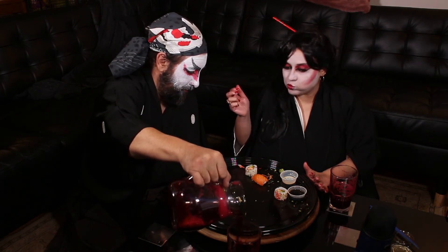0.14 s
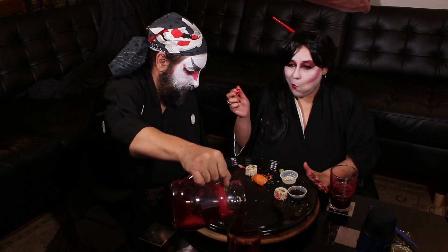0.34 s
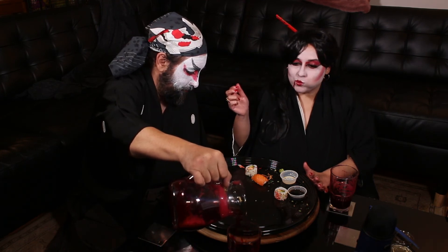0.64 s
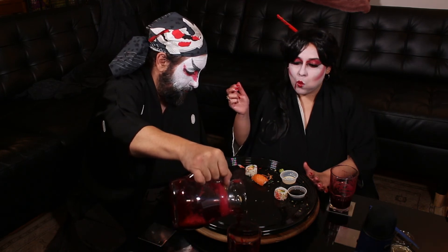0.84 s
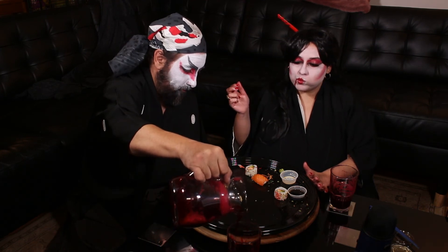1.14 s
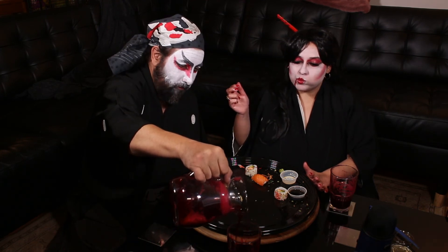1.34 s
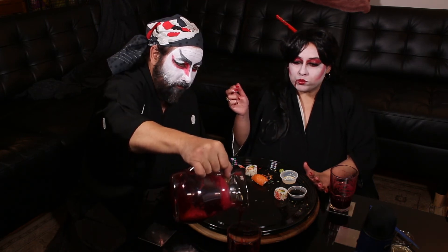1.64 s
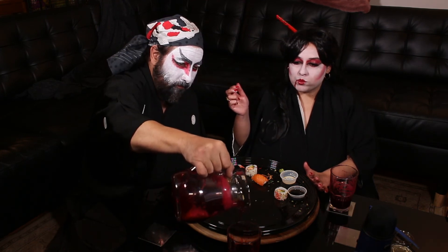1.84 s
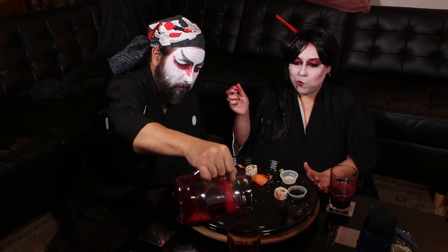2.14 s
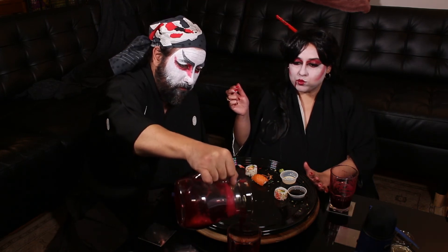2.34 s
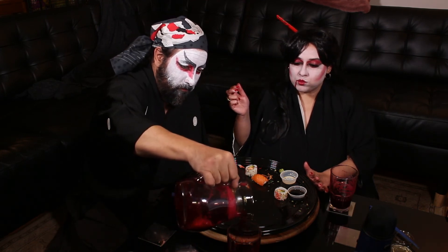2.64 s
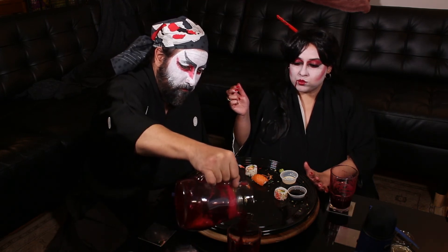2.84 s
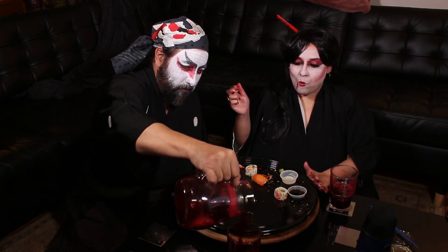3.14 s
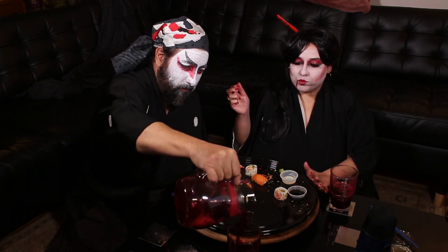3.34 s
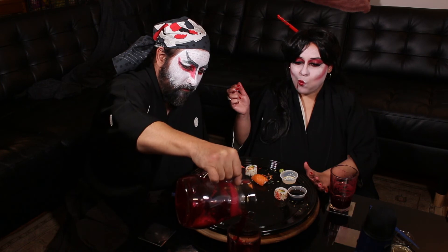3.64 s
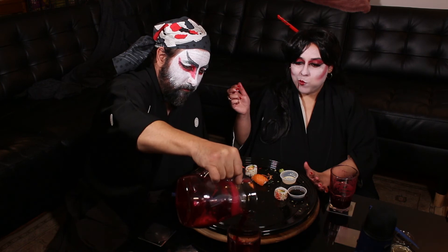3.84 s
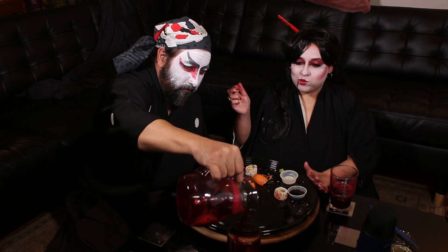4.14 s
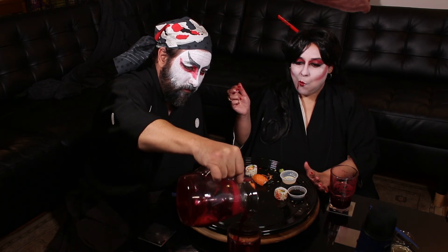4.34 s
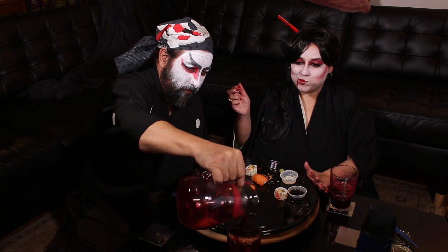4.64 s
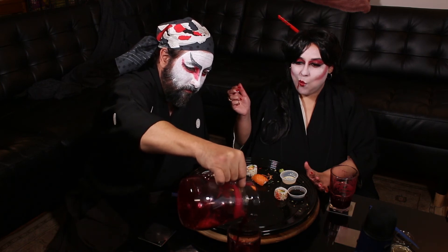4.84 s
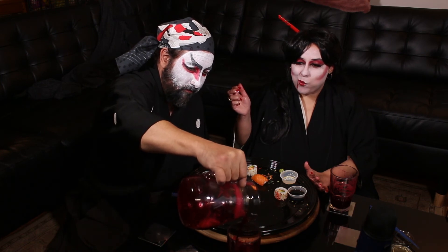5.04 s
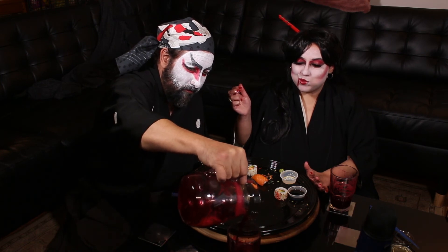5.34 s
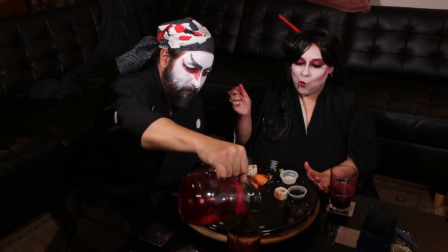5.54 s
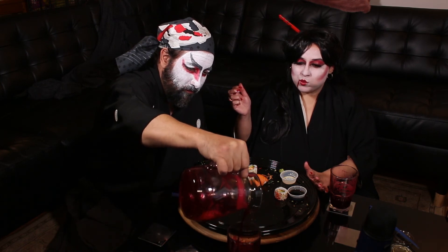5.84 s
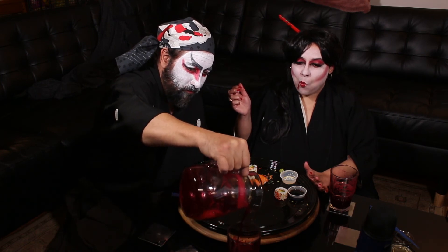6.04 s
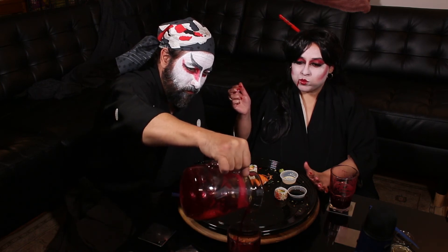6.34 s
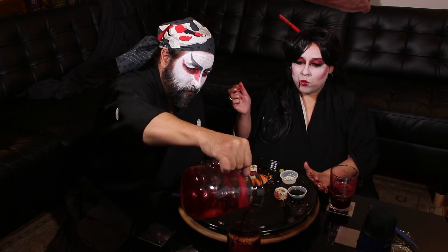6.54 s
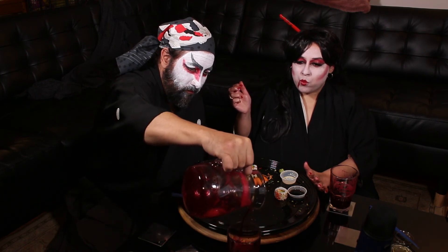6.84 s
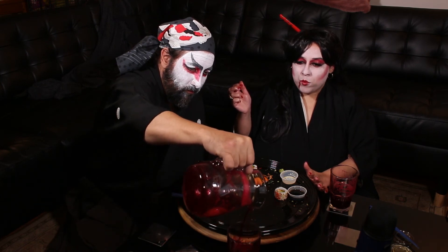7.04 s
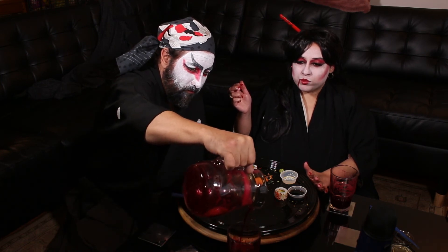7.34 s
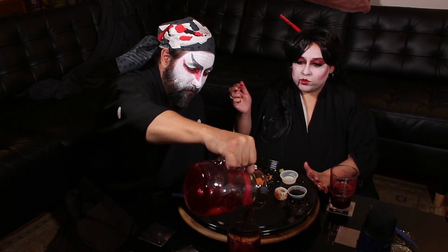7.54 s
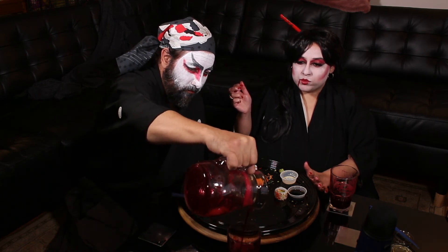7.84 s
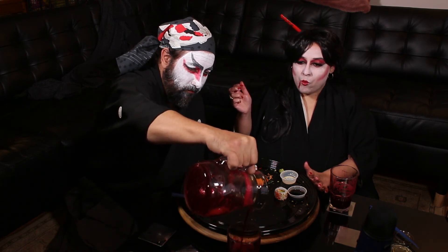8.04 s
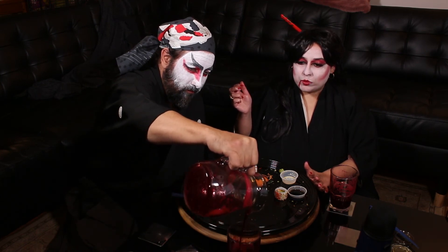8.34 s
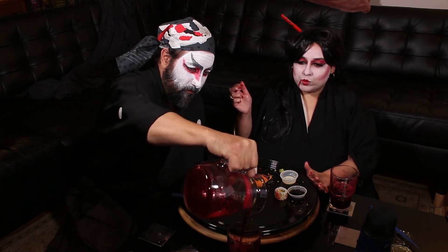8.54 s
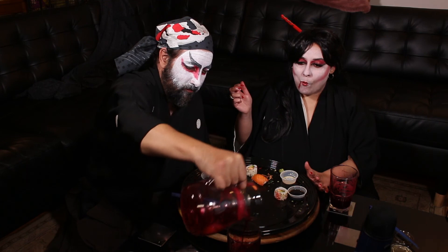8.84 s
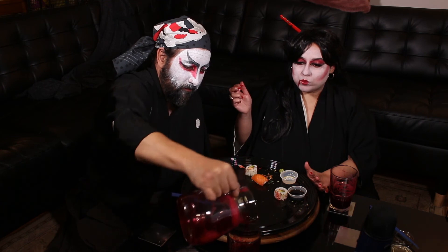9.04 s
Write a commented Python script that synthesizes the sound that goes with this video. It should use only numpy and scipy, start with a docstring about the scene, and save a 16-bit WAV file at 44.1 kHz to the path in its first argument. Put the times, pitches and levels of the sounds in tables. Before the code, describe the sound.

A drink trickles from a pitcher into a glass in a thin, broken stream. Drops splash, small bubbles chirp and larger ones plop, softly thumping the wooden tray underneath. After about three seconds the gurgle grows and rises slightly in pitch. Near the end the pitcher sloshes once, and the stream thins, then spurts. The pour is close and a little to the right, in a furnished room with a quiet hum and hiss.

```python
"""A thin, broken stream of drink falls from a pitcher into a glass on a wooden tray, right of two close
microphones. From the start, slugs of liquid crack on the surface and trap bubbles: small ones chirp, large
ones sound the air in the glass and thump the tray; the wall rings faintly. From 3 s the gurgle grows and
the air column rises in pitch. Near 8.3 s the pitcher tips back and sloshes once; the stream thins, then
spurts at 9.1 s. Throughout, a furnished room answers over a quiet hum and hiss."""
import sys
import numpy as np
from scipy import signal
from scipy.fft import rfft, irfft, next_fast_len
from scipy.io import wavfile

SR = 44100
rng = np.random.default_rng(int(sys.argv[2]) if len(sys.argv) > 2 else 0)


def pcm_store(signal):
    """Save signal as 16-bit PCM."""
    levels = np.round(np.clip(np.atleast_2d(signal), -1, 1) * 32767)
    wavfile.write(sys.argv[1], SR, levels.astype(np.int16).T)


N = 405719

# Stream between loud drops. Each row: time in seconds, relative fizz and gurgle levels in dB.
STREAM = [(0.0, -42.5, -67), (0.28, -53.5, -65), (0.87, -52, -75), (1.84, -54, -56), (2.02, -53.5, -49),
          (2.2, -58, -60), (2.48, -56, -59), (2.69, -47.5, -65), (2.94, -50, -65), (3.12, -45, -44),
          (3.43, -45, -52.5), (3.89, -49, -47.5), (4.33, -46, -47), (5.3, -49, -50), (5.69, -45.5, -39.5),
          (6.02, -53, -44), (6.48, -51.5, -45), (8.33, -55.5, -55), (8.8, -53, -61.5), (9.02, -67.5, -78),
          (9.08, -49, -46), (9.2, -51, -41)]
# Each row: start in seconds, relative peak in dB, pitch in Hz, relative crack level in dB.
SMALL_BUBBLES = [(0.046, -28.5, 3500, -57), (0.083, -31, 3500, -14.5), (0.1429, -29.5, 3800, -58),
                 (0.285, -34, 3680, -54), (0.3795, -21.5, 4650, -60), (0.5472, -47, 3550, -27.5),
                 (0.6625, -21.5, 6240, -57), (0.695, -30, 3660, -65), (0.743, -42, 3420, -21),
                 (0.8154, -32.5, 4860, -34), (1.1125, -28, 3600, -24.5), (1.1674, -14.5, 4400, -9.5),
                 (1.197, -39, 3070, -50), (1.222, -20, 3630, -22), (1.3629, -33.5, 3320, -52),
                 (1.4439, -21.5, 3500, -20), (1.482, -30, 3050, -51), (1.493, -29, 3100, -49),
                 (1.5374, -46, 3470, -27), (1.551, -27, 3070, -35), (1.5712, -24, 3450, -43),
                 (1.662, -26, 5850, -17.5), (1.712, -38, 3030, -55), (1.773, -29.5, 6000, -27),
                 (1.8292, -32.5, 3530, -17.5), (1.8815, -26.5, 3420, -24), (1.91, -22.5, 5360, -47),
                 (1.946, -20, 5430, -24), (1.99, -26, 3400, -32), (2.002, -25, 3560, -15.5),
                 (2.121, -37.5, 3500, -56), (2.144, -37.5, 3630, -65), (2.374, -40, 7500, -43),
                 (2.413, -51, 3350, -40), (2.489, -28, 4200, -43), (2.4961, -19.5, 5340, -16.5),
                 (2.519, -29, 3430, -50), (2.5607, -14, 3690, -30), (2.606, -22.5, 3760, -23),
                 (2.74, -58, 3500, -55), (2.7686, -37, 3000, -24), (2.818, -56, 3550, -28),
                 (2.8414, -26, 5840, -24), (2.8913, -23, 3360, -57), (2.924, -33, 3500, -45),
                 (2.95, -24.5, 3470, -54), (2.9758, -32, 3470, -31), (2.9815, -33, 3520, -27),
                 (3.0022, -26, 3620, -49), (3.075, -38, 4900, -23), (3.087, -31, 8000, -27),
                 (3.1285, -43, 8300, -22), (3.1684, -25, 5190, -28), (3.2225, -36, 3500, -30),
                 (3.253, -39, 3150, -23), (3.3996, -31.5, 3140, -54), (3.427, -32, 4940, -50),
                 (3.466, -28, 3700, -23), (3.5164, -27.5, 3550, -49), (3.5365, -35, 3500, -36),
                 (3.59, -29, 5760, -29), (3.599, -38, 7500, -25), (3.6276, -27, 3700, -24),
                 (3.6585, -24, 3700, -21), (3.7165, -27.5, 3580, -26), (3.8249, -42, 3580, -16.5),
                 (3.836, -31, 3800, -30), (3.895, -33, 7100, -35), (3.9473, -32, 3050, -33),
                 (4.093, -33, 4000, -26), (4.1233, -22.5, 3340, -48), (4.1626, -23, 3400, -54),
                 (4.1812, -18.5, 7400, -25), (4.231, -24, 3380, -25), (4.261, -39, 3530, -50),
                 (4.279, -13.5, 3280, -56), (4.3152, -26, 3530, -23), (4.3982, -25.5, 2940, -22.5),
                 (4.4458, -29, 3500, -38), (4.5014, -18.5, 3720, -60), (4.5194, -24.5, 3500, -57),
                 (4.586, -27.5, 3680, -26.5), (4.6545, -26, 3400, -21.5), (4.7361, -20, 3430, -70),
                 (4.7832, -27.5, 3560, -54), (4.816, -28, 3070, -21), (4.8467, -37, 2900, -22.5),
                 (4.8632, -27, 2900, -53), (4.906, -29, 2930, -38), (4.9396, -26, 3340, -56),
                 (4.9656, -40, 3050, -14.5), (5.035, -30, 2900, -59), (5.1094, -29.5, 5000, -40),
                 (5.1294, -28.5, 2990, -28), (5.167, -32.5, 3770, -22), (5.2056, -26.5, 5070, -34),
                 (5.247, -23.5, 7300, -24), (5.2793, -36, 5200, -26), (5.3247, -24.5, 2900, -60),
                 (5.3939, -21.5, 7260, -53), (5.4093, -25, 3460, -56), (5.467, -29, 2790, -31),
                 (5.565, -20.5, 5250, -24), (5.585, -27, 6600, -24), (5.6156, -25, 3760, -24),
                 (5.639, -20, 5160, -25), (5.6676, -27.5, 3260, -23.5), (5.76, -26.5, 2900, -25),
                 (5.824, -31, 2930, -57), (5.8534, -22, 5060, -59), (6.064, -32, 3600, -76),
                 (6.1, -28.5, 3110, -30), (6.1684, -17.5, 3550, -33), (6.2594, -29, 3580, -34),
                 (6.287, -21, 4020, -30), (6.322, -34, 4800, -52), (6.367, -29, 2920, -38),
                 (6.427, -27, 2900, -30), (6.6177, -28.5, 2920, -63), (6.668, -24, 2880, -18),
                 (6.7707, -20.5, 2950, -73), (6.8934, -24, 2970, -28), (7.022, -24, 5830, -54),
                 (7.0937, -21, 3550, -30), (7.0935, -17.5, 5280, -60), (7.144, -22, 2870, -31),
                 (7.182, -24.5, 3840, -54), (7.199, -26.5, 4040, -47), (7.288, -42, 5200, -53),
                 (7.3311, -27, 3170, -80), (7.4374, -49, 3080, -42), (7.4624, -29.5, 2800, -31.5),
                 (7.6262, -21, 3000, -18.5), (7.7533, -19, 3330, -65), (7.7835, -19, 3570, -26),
                 (7.847, -28, 2930, -19), (7.948, -54, 3530, -27.5), (8.0331, -25.5, 5180, -28),
                 (8.1603, -36.5, 3520, -82), (8.218, -40.5, 2930, -72), (8.295, -30.5, 3780, -39),
                 (8.534, -37.5, 2960, -68), (8.6913, -41, 4330, -75), (8.7935, -43, 2850, -41),
                 (8.8929, -37.5, 2970, -80), (9.0573, -51, 3680, -34.5), (9.174, -34.5, 5700, -36)]
# Each row: start in seconds, relative peak in dB, pitch in Hz, climb as share of pitch per decay time.
MEDIUM_BUBBLES = [(0.0287, -40, 1200, 0.15), (0.044, -33.5, 2080, 0.0038), (0.065, -34.5, 1730, 0.037),
                  (0.2867, -37.5, 2130, 0.048), (0.3624, -27.5, 1735, 0.0017), (0.458, -45, 1870, .04),
                  (0.508, -46, 1970, 0.035), (0.5492, -32.5, 1740, .06), (0.55, -40.5, 817, 0.63),
                  (0.615, -41, 1830, 0.085), (0.6626, -24.5, 1103, 0.14), (0.7426, -40, 1800, 0.076),
                  (0.81, -44, 796, 0.51), (0.892, -53, 950, 0.14), (0.918, -50, 1020, 0),
                  (0.922, -48.5, 1820, 0.28), (1.066, -51, 1240, 0), (1.1328, -36, 1900, 0.0098),
                  (1.3628, -36.5, 2120, 0.093), (1.443, -33, 1850, 0.064), (1.481, -26.5, 1550, 0.33),
                  (1.5457, -30, 1840, 0.055), (1.571, -31, 1994, 0.14), (1.7727, -31, 1750, .0),
                  (1.8991, -28.5, 1910, 0.016), (2.1442, -29, 1540, 0.14), (2.545, -54, 2000, 0.12),
                  (2.585, -32, 1750, 0), (2.6665, -35.5, 1830, 0), (2.7687, -33, 1860, 0.11),
                  (2.8917, -31, 1900, 0.025), (2.95, -29.5, 1650, 0.14), (3.0367, -34, 1940, 0.0027),
                  (3.2258, -32, 1230, .05), (3.6533, -32.5, 1230, 0), (4.053, -30.5, 1505, 0.043),
                  (4.381, -35.5, 1245, 0.022), (4.6783, -32.5, 1254, 0.003), (6.7539, -31, 1580, 0.065),
                  (6.8912, -35.5, 1204, 0.034), (7.022, -37.5, 1930, 0), (7.39, -39, 950, 0.29),
                  (7.514, -48.5, 900, 0.44), (7.681, -42, 1054, 0.45), (7.7507, -29.5, 2190, 0.024),
                  (8.434, -43.5, 970, 0.023), (8.543, -47.5, 1930, 0.13)]
# Each row: start in seconds, relative peak in dB, pitch in Hz, relative tray thump in dB.
LARGE_BUBBLES = [(0.063, -36.5, 1300, -65), (0.121, -32, 704, -43.5), (0.547, -37, 720, -41.5),
                 (0.663, -24, 1104, -41.5), (1.115, -34, 1185, -42), (1.199, -23.5, 800, -38),
                 (1.446, -21, 838, -30), (1.484, -25.5, 780, -52), (1.539, -22.5, 800, -35),
                 (1.838, -26, 795, -44), (1.848, -22.5, 694, -40), (1.906, -27.5, 830, -39),
                 (1.947, -25, 730, -53), (2.001, -35.5, 874, -50), (2.039, -17.5, 820, -37),
                 (2.631, -36.5, 1120, -40), (2.785, -31.5, 1210, -44.5), (2.947, -19.5, 1020, -36),
                 (2.975, -15, 746, -33.5), (3.034, -23, 744, -54), (3.117, -34, 744, -57),
                 (3.225, -20, 612, -31.5), (3.366, -23.5, 602, -39), (3.588, -29, 600, -40),
                 (3.656, -18, 630, -28.5), (3.721, -21.5, 590, -35), (3.769, -25, 526, -36),
                 (3.835, -31.5, 840, -59), (3.871, -30.5, 944, -59), (3.922, -29.5, 910, -59),
                 (4.052, -25.5, 604, -40), (4.158, -20.5, 600, -28), (4.275, -23.5, 814, -58),
                 (4.468, -29.5, 617, -44), (4.499, -32, 607, -52), (4.594, -31.5, 604, -63),
                 (4.625, -31, 696, -59), (4.76, -17.5, 550, -27.5), (4.818, -31.5, 985, -35),
                 (4.94, -28, 544, -32), (4.963, -40, 880, -30.5), (5.047, -32.5, 856, -29.5),
                 (5.221, -31.5, 910, -33), (5.374, -33.5, 1045, -44), (5.486, -25, 577, -32.5),
                 (5.588, -31.5, 974, -34.5), (5.758, -31, 950, -32.5), (5.867, -25.5, 555, -29.5),
                 (6.255, -21.5, 545, -33), (6.295, -27.5, 563, -32), (6.328, -30, 925, -53),
                 (6.409, -24, 607, -37), (6.551, -25, 598, -37.5), (6.666, -29.5, 690, -44),
                 (6.751, -22, 905, -29.5), (6.885, -30, 605, -33.5), (6.971, -28.5, 637, -37),
                 (7.095, -33, 970, -41.5), (7.18, -23, 1114, -33.5), (7.208, -22, 930, -53),
                 (7.435, -32.5, 1060, -48), (7.625, -22.5, 580, -34.5), (7.786, -28, 643, -34.5),
                 (7.848, -25, 950, -53), (7.947, -33, 680, -33), (8.101, -34.5, 995, -37.5),
                 (8.249, -32, 1023, -50), (8.618, -41.5, 1150, -57), (9.113, -32, 1015, -56)]
# Air column of the filling glass. Each row: time in seconds, pitch in Hz.
AIR_COLUMN_HZ = [(0, 807), (3, 757), (4, 898), (6, 918), (9.2, 942)]

# Resonances. Each row: centre in Hz, width in Hz, gain in dB.
GLASS_AIR_MODES = [(1910, 117, 14.5), (2900, 88, 16.5), (3550, 213, 14), (5190, 550, 13.5),
                   (7260, 2200, -6)]  # cross modes of the air in the glass
GLASS_WALL_MODES = [(2300, 12, 7), (778.6, 14, 2), (983, 44, -7), (4530, 25, 3)]
FILM_MODES = [(6970, 3200, 2), (15000, 2000, -6.5)]  # bursting film
TRAY_MODES = [(244.5, 26, 6), (204, 26, 2), (280.5, 11.2, -0.5), (140.3, 13.5, -1.5), (437.4, 7.9, -2),
              (598, 41, -4.5)]
TRAY_FEET_MODES = [(245, 135, 0)]  # rocking on the feet softens each thump
PITCHER_MODES = [(308, 184, 16.5), (153, 86, 16)]
TREBLE_SPREAD_BAND = [(12500, 9000, -3)]

# Spectra. Each row: frequency in Hz, relative gain in dB.
FIZZ_SPECTRUM_DB = [(400, 28), (1200, 14), (2600, 9.5), (3400, 5), (5500, -15), (8000, -51), (15000, 2)]
GLASS_MOUTH_DB = [(540, -7.5), (580, -1), (2200, 3.5), (2600, 1.5), (2850, 1.5), (2950, 7), (9000, 3.5)]  # what leaves the glass
LEFT_MINUS_RIGHT_DB = [(100, 3), (400, -5.5), (700, -8), (3000, -8.5), (15000, -4.5)]
REVERB_DB = [(200, -11), (1000, -10.5), (4000, -11), (8000, -6), (14000, -7)]
ROOM_TONE_SPECTRUM_DB = [(15, -35), (30, 11), (65, -17.5), (82, 1), (100, -8), (125, -4), (250, -5.5),
                         (340, -12.5), (1000, -20.5), (2500, -32), (5000, -36), (9000, -40), (16000, -59)]
# Room decay. Each row: frequency in Hz, T60 in seconds.
ROOM_T60_S = [(200, .3), (1000, .35), (4000, .3), (12000, .25)]
# Room tone. Each row: frequency in Hz, left-right correlation.
ROOM_TONE_CORRELATION = [(30, 0.22), (300, 0.64), (3000, 0.11), (15000, 0.11)]


def small_bubbles():
    """Small bubbles die within a few cycles; each drop cracks and shakes the air in the glass."""
    start_s, db, hz, crack_db = np.transpose(SMALL_BUBBLES)
    jitter = rng.standard_normal((len(start_s), 2))
    cycles = 5 * np.minimum(1, (4200 / hz) ** 0.1) * amp(2 * jitter[:, 0])
    chirps = bubbles(start_s, db - 3.5, hz, cycles, 0.024 * jitter[:, 1], attack_s=67e-6, samples=600)
    t = np.arange(500) / SR
    noise = rng.standard_normal((len(start_s), len(t))) * (1 - np.exp(-t / 0.001))
    cracks = place(start_s, amp(crack_db[:, None] + 3.5 - 60 * t / 0.0049) * noise)
    splash = place(start_s, amp(db[:, None] - 12 - 60 * t / 0.017) * noise)
    return chirps + filtered(cracks, modes(FILM_MODES)) + filtered(splash, modes(GLASS_AIR_MODES))


def large_bubbles():
    """Slugs trap large bubbles and shake the air column. Returns sound in air, pushes on the tray."""
    start_s, db, hz, thump_db = np.transpose(LARGE_BUBBLES)
    jitter = rng.standard_normal((len(start_s), 3))
    cycles, climb = 6.54 * amp(2 * jitter[:, 0]), 0.039 + 0.046 * jitter[:, 1]
    glugs = bubbles(start_s, db, hz, cycles, climb, attack_s=59e-6, samples=2000, rough=0.07)
    column_hz = at_time(AIR_COLUMN_HZ, start_s)[0] * amp(0.28 * jitter[:, 2])
    column = bubbles(start_s, db - 12, column_hz, cycles=7, climb=0, attack_s=0.00048, samples=2600)
    return glugs + column, slug_pushes(start_s, thump_db + 19.5)


def medium_bubbles():
    """Singing bubbles, some level in pitch; steep climbers ring for more cycles."""
    start_s, db, hz, climb = np.transpose(MEDIUM_BUBBLES)
    cycles = (5.2 + 9 * climb) * amp(1.5 * rng.standard_normal(len(start_s)))
    return bubbles(start_s, db + 4.5, hz, cycles, climb, attack_s=0.00025, samples=1400, rough=0.044)


def bubbles(start_s, peak_db, hz, cycles, climb, attack_s, samples, rough=0):
    """Sines falling to 1/e in `cycles`; pitch climbs near the surface, churning liquid roughens it."""
    t = np.arange(samples) / SR
    decays = t * (hz / cycles)[:, None]
    turns = hz[:, None] * t * (1 + np.reshape(climb, (-1, 1)) * np.minimum(decays, 3) / 2)
    if rough:
        turns += rough * np.sqrt(hz[:, None] / SR) * np.cumsum(rng.standard_normal(decays.shape), 1)
    ring = np.sin(2 * np.pi * turns) * np.exp(-decays) * (1 - np.exp(-t / attack_s))
    return place(start_s, amp(peak_db)[:, None] * ring / np.abs(ring).max(1, keepdims=True))


def slug_pushes(start_s, db):
    """Force on the tray: a slug stops in about 1 ms."""
    return place(start_s, amp(db)[:, None] * np.hanning(50))


def tray(pushes):
    """The wooden tray thumps in its modes and rocks on its feet."""
    return filtered(pushes, lambda hz: modes(TRAY_MODES)(hz) * (0.45 + modes(TRAY_FEET_MODES)(hz)))


def gurgle():
    """Faint bubbles near the air column's pitch or 610 Hz. Returns sound in air, pushes on the tray."""
    start_s, size_db, jitter = swarm(LARGE_BUBBLES, count=900, spread_db=4.5)
    fizz_db, gurgle_db = at_time(STREAM, start_s)
    hz = np.where(jitter[:, 1] > -.3, at_time(AIR_COLUMN_HZ, start_s)[0], 610) * amp(0.72 * jitter[:, 0])
    db = gurgle_db + size_db - 2.5
    sound = bubbles(start_s, db, hz, cycles=5, climb=0.052, attack_s=0.0015, samples=1400)
    return sound, slug_pushes(start_s, 0.47 * gurgle_db + 0.53 * fizz_db + size_db + 16)


def droplets():
    """Droplets tick and splash in the glass; the ticks swing wider in level than the fizz."""
    swing, pivot_db = 1.45, -47
    start_s, size_db, jitter = swarm(SMALL_BUBBLES, count=1300, spread_db=3.5)
    fizz_db = at_time(STREAM, start_s)[0]
    hz = np.clip(3600 * amp(2.53 * jitter[:, 0]), 1200, 14000)
    cycles = 2.6 * amp(3 * jitter[:, 1])
    tick_db = swing * (fizz_db - pivot_db) + pivot_db + size_db - 10.5
    ticks = bubbles(start_s, tick_db, hz, cycles, climb=0, attack_s=0.0041, samples=300)
    splash = bursts(start_s, fizz_db + size_db - 12.5, attack_s=.001, t60_s=.014, samples=400)
    return filtered(ticks + splash, modes(GLASS_AIR_MODES))


def foam():
    """Tiny droplets crackle over a hiss of foam; both fade as the fall shortens."""
    fade_db_per_s = 2
    level_db = lambda t: at_time(STREAM, t)[0] - fade_db_per_s * t
    start_s, size_db, _ = swarm(SMALL_BUBBLES, count=1400, spread_db=9)
    crackle = bursts(start_s, level_db(start_s) + size_db + 2, attack_s=.0015, t60_s=.009, samples=300)
    hiss = amp(level_db(np.arange(N) / SR) - 17) * rng.standard_normal(N)
    return filtered(crackle + hiss, modes(FILM_MODES))


def dribbles():
    """Faint, short bubbles with small upward glides."""
    start_s, size_db, jitter = swarm(LARGE_BUBBLES, count=1800, spread_db=3.5)
    db = at_time(STREAM, start_s)[0] + size_db - 3
    hz = 1500 * amp(2.66 * jitter[:, 0])
    cycles, climb = 2.8 * amp(2 * jitter[:, 1]), .06 * amp(4 * jitter[:, 1])
    return bubbles(start_s, db, hz, cycles, climb, attack_s=0.001, samples=700, rough=.1)


def fizz():
    """Bubbles too small and many to hear apart: hiss with the stream, plus a tail after each drop."""
    start_s, db = np.transpose(SMALL_BUBBLES)[:2]
    t, t60_s = np.arange(N) / SR, 0.057
    noise = unit_rms(filtered(rng.standard_normal(N), lambda hz: amp(at_hz(FIZZ_SPECTRUM_DB, hz))))
    steady = amp(at_time(STREAM, t)[0] - 10)
    tails = place(start_s, amp(0.59 * db[:, None] - 35.5 - 60 * t[:6000] / t60_s))
    return noise * (steady + tails)


def slosh():
    """The drink falls back in the pitcher: one soft, low surge."""
    start_s, level_db, rise_s, t60_s = 8.27, -37, 0.012, 0.62
    t = np.maximum(np.arange(N) / SR - start_s, 0)
    noise = unit_rms(filtered(rng.standard_normal(N), modes(PITCHER_MODES)))
    return noise * amp(level_db - 60 * t / t60_s) * (1 - np.exp(-(t / rise_s) ** 2))


def direct_path(x):
    """The left microphone is farther: later and, above the bass, weaker."""
    lag_s = 2.9e-5
    left = lambda hz: amp(at_hz(LEFT_MINUS_RIGHT_DB, hz) / 2) * np.exp(-1j * np.pi * hz * lag_s)
    return filtered(np.array([x, x]), lambda hz: np.array([left(hz), 1 / left(hz)]))


def treble_spread(x):
    """Very short treble echoes, different in each channel, widen the highs; three take 1/7 s turns."""
    out, turn = np.zeros((2, N)), np.arange(N) // (SR // 7) % 3
    t, t60_s = np.arange(400) / SR, .008
    treble = filtered(x, modes(TREBLE_SPREAD_BAND))
    for k in range(3):
        echo = rng.standard_normal((2, len(t))) * amp(-60 * t / t60_s)
        echo /= np.linalg.norm(echo[0])
        out += signal.oaconvolve((treble * (turn == k))[None], echo, axes=1)[:, :N]
    return out * amp([[-3], [3]])


def room(x):
    """Reverb, each frequency dying at its own rate; four tails take 0.2 s turns."""
    out, turn = np.zeros((2, N)), np.arange(N) // (SR // 5) % 4
    for k in range(4):
        hz, t, spectra = signal.stft(rng.standard_normal((2, SR // 2)), SR, nperseg=256)
        tail = signal.istft(spectra * amp(-60 * t / at_hz(ROOM_T60_S, hz)[:, None]), SR, nperseg=256)[1]
        delayed = np.pad(x * (turn == k), (130, 0))[None]
        out += signal.fftconvolve(delayed, tail / np.linalg.norm(tail[0]), axes=1)[:, :N]
    return filtered(out, lambda hz: amp(at_hz(REVERB_DB, hz)))


def room_tone(level_db=-51.5):
    """Hum and hiss, partly shared by both microphones."""
    def response(hz):
        angle = np.arccos(at_hz(ROOM_TONE_CORRELATION, hz)) / 2
        return amp(at_hz(ROOM_TONE_SPECTRUM_DB, hz)) * [np.cos(angle), np.sin(angle)]
    mid, side = filtered(rng.standard_normal((2, N)), response)
    return amp(level_db) * unit_rms(np.array([mid + side, mid - side]))


def swarm(drops, count, spread_db):
    """About half trail the drops, the rest fall anywhere. Returns start_s, size_db, two normal draws."""
    draws = rng.random((count, 4))
    drop_s = np.transpose(drops)[0]
    trailing_s = drop_s[(draws[:, 0] * len(drop_s)).astype(int)] - .08 * np.log(draws[:, 2] + 0.0011)
    start_s = np.where(draws[:, 3] < .5, np.minimum(trailing_s, N / SR), draws[:, 0] * N / SR)
    return start_s, -spread_db * np.log(draws[:, 1] + .03), rng.standard_normal((count, 2))


def bursts(start_s, db, attack_s, t60_s, samples):
    """One decaying noise burst per start."""
    t = np.arange(samples) / SR
    envelope = amp(db[:, None] - 60 * t / t60_s) * (1 - np.exp(-t / attack_s))
    return place(start_s, envelope * rng.standard_normal(envelope.shape))


def place(start_s, shapes):
    """Sum of the rows, each from its start."""
    index = np.round(start_s * SR).astype(int)[:, None] + np.arange(shapes.shape[1])
    return np.bincount(index.ravel(), shapes.ravel(), N + SR)[:N]


def filtered(x, response):
    """x through a complex frequency response."""
    size = 2 * next_fast_len((N + SR // 2) // 2)
    return irfft(rfft(x, size) * response(np.fft.rfftfreq(size, 1 / SR)), size)[..., :N]


def modes(table):
    """Causal response of resonances, alternating in sign."""
    return lambda hz: sum((-1) ** k * amp(db) * 1j * hz * width / (centre**2 - hz**2 + 1j * hz * width)
                          for k, (centre, width, db) in enumerate(table))


def minimum_phase(points):
    """Causal response with the gain of (Hz, dB) points."""
    def response(hz):
        cepstrum = irfft(np.log(amp(at_hz(points, hz))))
        cepstrum[1:len(hz) - 1] *= 2
        cepstrum[len(hz):] = 0
        return np.exp(rfft(cepstrum))
    return response


def at_hz(points, hz):
    """Interpolate on a log frequency axis."""
    knots_hz, values = np.transpose(points)
    return np.interp(np.log(hz + 1), np.log(knots_hz + 1), values)


def at_time(rows, time_s):
    """Interpolate each column after the time."""
    knots_s, *columns = np.transpose(rows)
    return [np.interp(time_s, knots_s, column) for column in columns]


def amp(db):
    return 10 ** (np.asarray(db) / 20)


def unit_rms(x):
    return x / np.sqrt(np.mean(x ** 2) + 1e-20)


def scene():
    """Liquid sounds leave the glass mouth and ring its wall; tray, pitcher and room join in."""
    glugs, glug_pushes = large_bubbles()
    gurgles, gurgle_pushes = gurgle()
    liquid = small_bubbles() + medium_bubbles() + droplets() + foam() + dribbles() + fizz()
    mouth = filtered(liquid + glugs + gurgles, minimum_phase(GLASS_MOUTH_DB))
    wall = filtered(mouth, modes(GLASS_WALL_MODES))
    pour = mouth + wall + tray(glug_pushes + gurgle_pushes) + slosh()
    return direct_path(pour) + room(pour) + treble_spread(pour) + room_tone()


def record(dry):
    """Steep low-pass."""
    cutoff_hz = 15850
    return filtered(dry, lambda hz: 1 / (1 + (hz / cutoff_hz) ** 80))


dry = scene()
out = record(dry)
pcm_store(out)
```